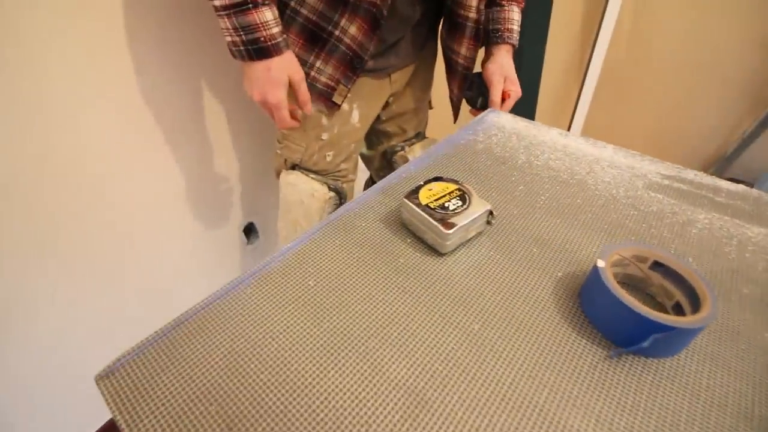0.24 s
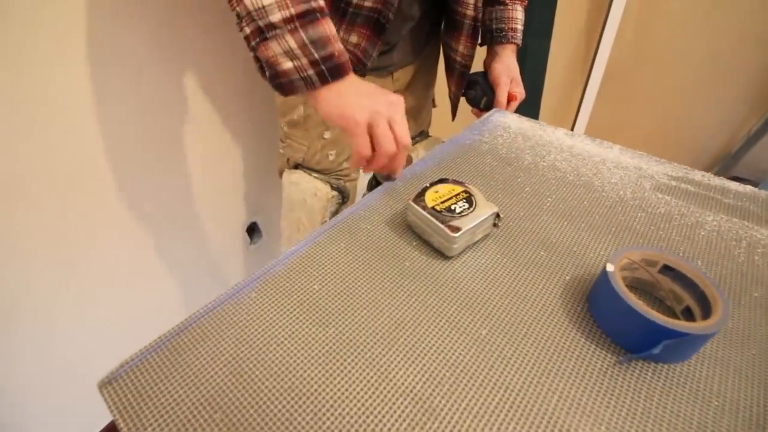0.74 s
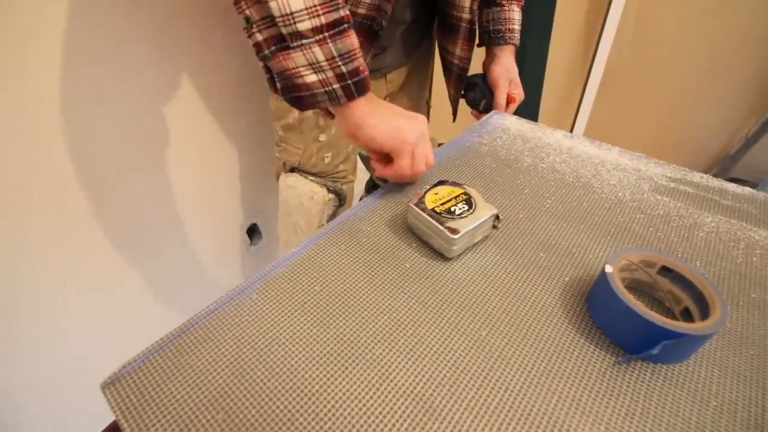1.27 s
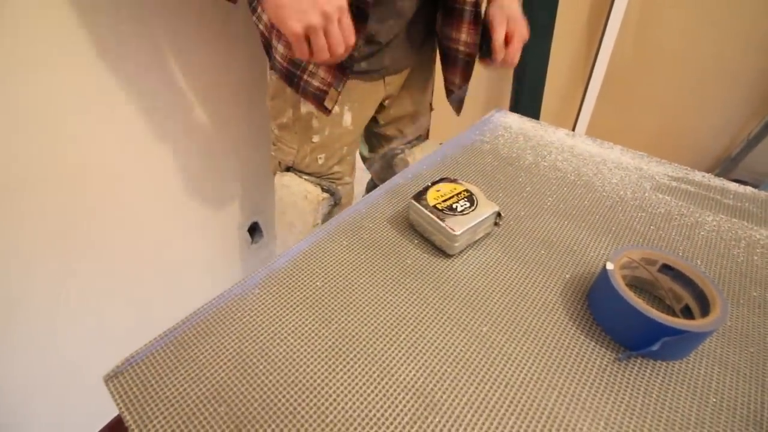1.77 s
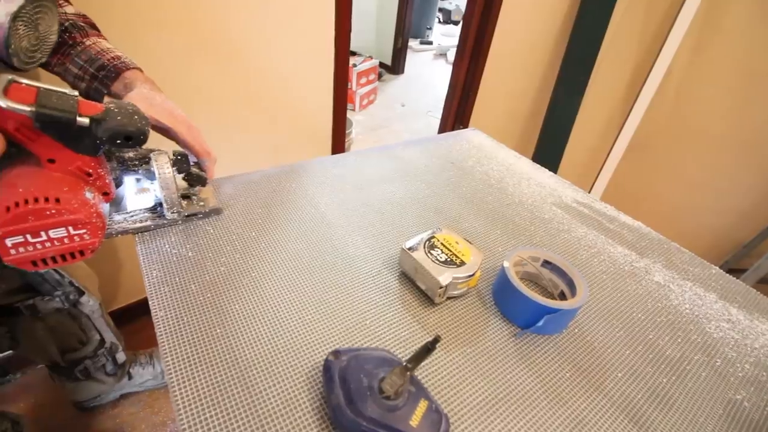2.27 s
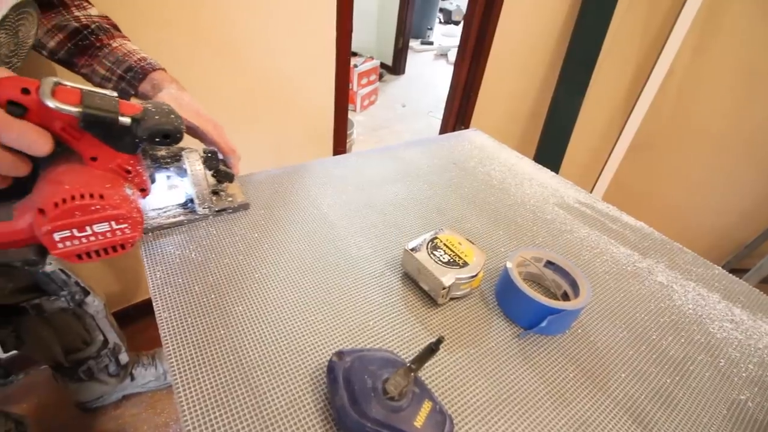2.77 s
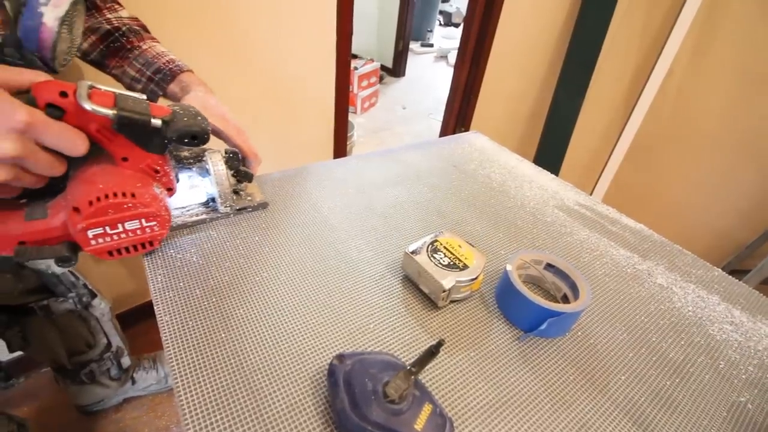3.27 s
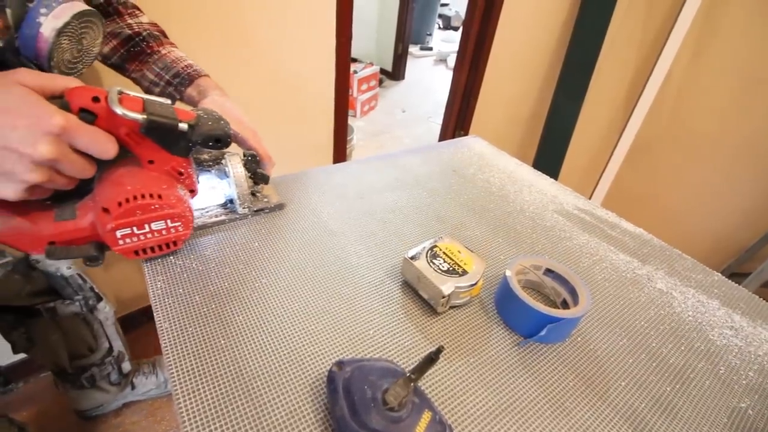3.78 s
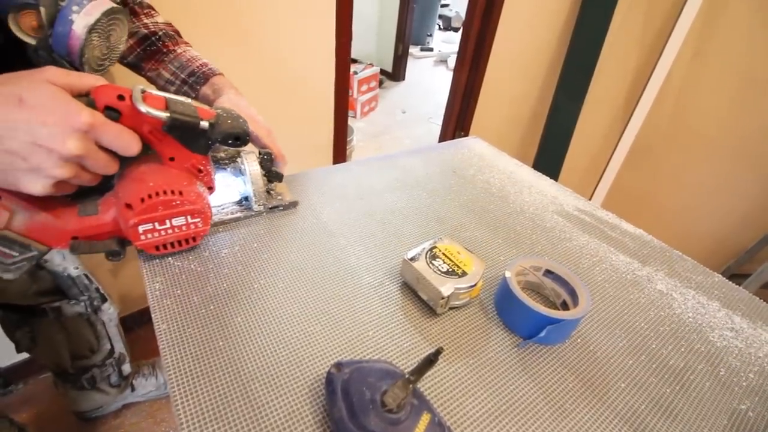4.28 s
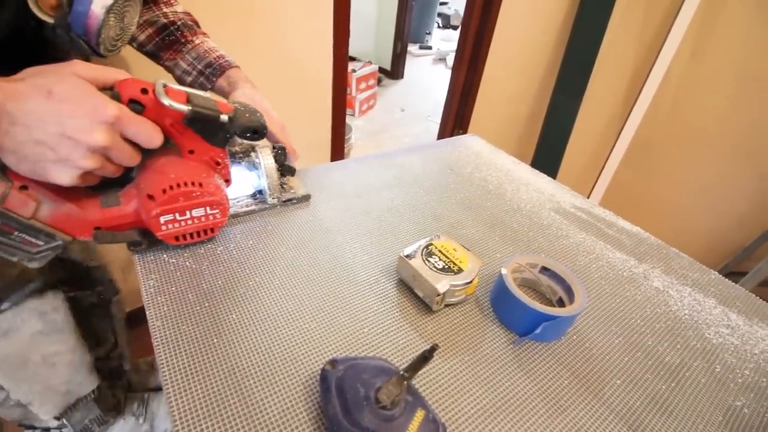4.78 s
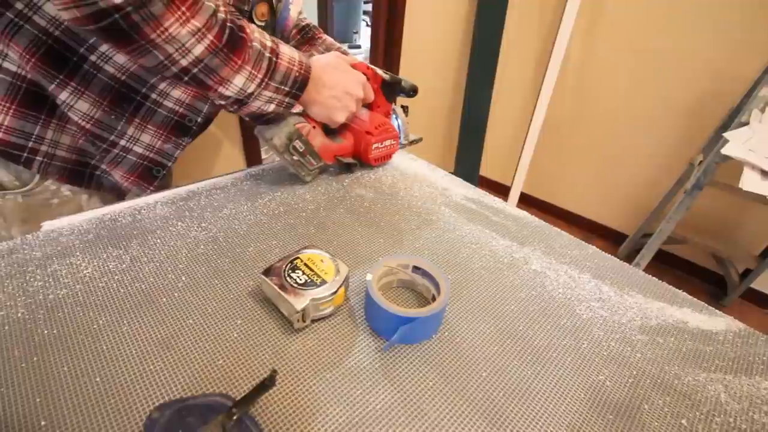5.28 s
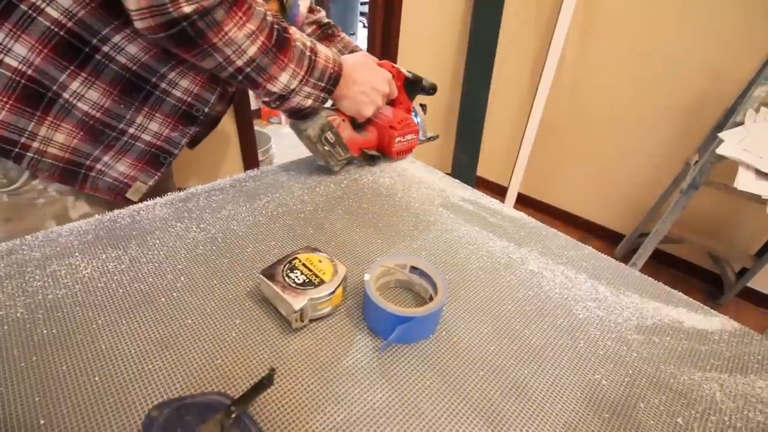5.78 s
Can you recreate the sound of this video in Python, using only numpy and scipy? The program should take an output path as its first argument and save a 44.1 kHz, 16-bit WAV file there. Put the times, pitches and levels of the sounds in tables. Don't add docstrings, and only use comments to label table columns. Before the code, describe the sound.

Chalk line plucked and snapped loudly against hollow board, a short blank gap, then a small circular saw's steady, buzzing whine through foam, turned well down.

```python
import sys
import numpy as np
from scipy import signal
from scipy.fft import rfft, irfft
from scipy.io import wavfile
from scipy.ndimage import uniform_filter1d

SR = 44100
rng = np.random.default_rng(int(sys.argv[2]) if len(sys.argv) > 2 else 0)


def magnitude_from_level(level_db):
    exponent = np.asarray(level_db, float) / 20
    return 10 ** exponent


def inscribe(sig):
    pcm = np.round(np.clip(np.atleast_2d(sig).T, -1, 1) * 32767)
    wavfile.write(sys.argv[1], SR, pcm.astype(np.int16))


N = 266364

SILENT_S = 2.1095, 2.218
START_S, FREE_TURNS_PER_S = 2.247, 76.5
EASING_S = [5.55, 5.68]
CRACK_HZ, SOFT_CRACK_HZ = 6340, 4000

# f/Hz, density/dB per Hz
TAP_COLOUR = [(35, -40), (60, -10.5), (266, -18.5), (327, -7), (423, -11.5), (572, -7), (792, -6),
              (1170, 3), (2650, -11.5), (3500, 0.5), (15500, -37)]
# f/Hz, density/dB per Hz
FAN_COLOUR = [(25, -28), (60, -30), (200, -19), (300, -12.5), (704, -11), (1520, -17.5), (1820, -16.5),
              (2450, -26), (3390, -21), (4030, -20.5), (8000, -44.5), (15500, -45.5)]
# f/Hz, density/dB per Hz
CUT_COLOUR = [(290, -21.5), (500, -28.5), (927, -17.5), (1220, -10.5), (1750, -8), (2600, -12.5),
              (3480, -3), (4190, -8), (5430, -7), (7000, -11.5), (10000, -15.5), (15500, -23.5)]
# f/Hz, width/Hz, level/dB
HOUSING_MODES = [(1283, 27, 3), (1540, 257, -5), (3750, 83, -12), (5100, 130, -2.5), (6440, 100, -32)]
# f/Hz, width/Hz, level/dB
BLADE_MODES = [(1370, 58, 0), (3070, 44, -11), (3800, 410, -1), (4130, 180, -0.5), (4800, 50, 6),
               (6230, 88, -2.5), (7840, 98, 11), (9440, 84, 8.5)]


def clock():
    return np.arange(N) / SR


def in_time(points):
    return np.interp(clock(), *np.transpose(points))


def at_hz(points, hz):
    table_hz, values = np.transpose(points)
    return np.interp(np.log(hz + 1), np.log(table_hz), values)


def ramp(span_s):
    return np.interp(clock(), span_s, [0, 1])


def bump(middle_s, width_s):
    return np.exp(-.5 * ((clock() - middle_s) / width_s) ** 2)


def noise():
    return rng.standard_normal(N)


def rms_one(x):
    return x / np.sqrt(np.mean(x ** 2) + 1e-20)


def kernel(tone, size=4096):
    cepstrum = irfft(np.log(magnitude_from_level(at_hz(tone, np.fft.rfftfreq(size, 1 / SR)))))
    cepstrum[1:size // 2] *= 2
    cepstrum[size // 2 + 1:] = 0
    return rms_one(irfft(np.exp(rfft(cepstrum)))) / np.sqrt(size)


def coloured(x, tone):
    return signal.fftconvolve(x, kernel(tone))[:N]


def filtered(x, order, hz, kind="low"):
    return signal.sosfilt(signal.butter(order, hz, kind, fs=SR, output="sos"), x)


def drift(rate):
    r = np.exp(-80 * np.pi * rate / SR)
    slow = signal.lfilter([1], [1, -2 * r, r * r], rng.standard_normal(N // 40 + 2002))[2000:]
    return np.interp(np.arange(N) / 40, np.arange(len(slow)), rms_one(slow))


def ring(x, hz, t60_s):
    r, w = magnitude_from_level(-60 / (t60_s * SR)), 2 * np.pi * hz / SR
    return signal.lfilter([0, np.sin(w)], [1, -2 * r * np.cos(w), r * r], x + 1e-18)


def resonate(x, modes):
    out = x
    for hz, width_hz, db in modes:
        gain = magnitude_from_level(db) * 2 * np.pi * width_hz / SR
        out = out + gain * ring(x, hz, 1.9 / width_hz)
    return out


def room_tail():
    # f/Hz, t60/s
    room_t60 = [(60, 0.33), (250, 0.86), (700, 0.64), (2000, 0.65), (4000, 0.59), (8000, 0.48),
                (15000, 0.32)]
    t, out = np.arange(SR) / SR, 0
    edges_hz = 35 * 2 ** np.arange(0, 9.1, .5)
    for low, high in zip(edges_hz, edges_hz[1:]):
        band = filtered(rng.standard_normal(SR), 2, [low, high], "band")
        out = out + band * magnitude_from_level(-60 * t / at_hz(room_t60, np.sqrt(low * high)))
    return out * (1 - np.exp(-t / 0.0014))


def blows(table, tone, board_db, tail, t60_s, crack_hz=CRACK_HZ):
    # f/Hz, level/dB, t60/s
    board_modes = [(75.6, -30.5, 0.26), (173, -33.5, 0.4), (336, -19.5, 0.29), (530, -23.5, 0.26),
                   (815, -38.5, 0.4), (1177, -28, 0.2), (1398, -24.5, 0.16)]
    out, click = np.zeros(N + SR), np.eye(1, SR)[0]
    fade = np.exp(-np.arange(SR) / 51.5)
    board = sum(magnitude_from_level(db + board_db + 12.5) * ring(click, hz, decay_s) for hz, db, decay_s in board_modes)
    after = board + coloured(tail, tone)[:SR]
    crack_filter = signal.butter(2, crack_hz, fs=SR)
    contact_filter = signal.butter(2, 1.7 * crack_hz, fs=SR)
    for s, peak_db, hz, room_db, crack_db in table:
        crack = magnitude_from_level(crack_db + 12.5) * signal.lfilter(*crack_filter, fade * rng.standard_normal(SR))
        tone_ring = ring(click, hz, .35 if hz < 400 else t60_s)
        contact = signal.lfilter(*contact_filter, tone_ring + crack)
        out[round(s * SR):][:SR] += magnitude_from_level(peak_db) * (contact + magnitude_from_level(room_db) * after)
    return out[:N]


def room_air_and_footfalls():
    # t/s, rumble level/dB
    steps = [(0, -58), (.17, -63), (.31, -48), (.66, -72), (.89, -64.5), (1.09, -63), (1.23, -55),
             (1.45, -61)]
    # f/Hz, density/dB per Hz
    air_tone = [(18, -43), (30, -12), (187, -12.5), (234, -7.5), (265, -2.5), (555, -7), (722, -10.5),
                (2000, -16.5), (2600, -67.5), (4400, -120)]
    rise_db_per_s, fall_db_per_s = 500, 128.5
    t = clock()
    rumble_db = np.max([db - np.maximum(rise_db_per_s * (s - t), fall_db_per_s * (t - s))
                        for s, db in steps], axis=0)
    air_level = magnitude_from_level(-65) + magnitude_from_level(rumble_db - 7)
    air = air_level * magnitude_from_level(1.6 * drift(11)) * coloured(noise(), air_tone)
    return air + magnitude_from_level(rumble_db) * rms_one(filtered(noise(), 4, 176))


def far_hiss():
    # t/s, level/dB
    hiss_db = [(0, -56.5), (.17, -72), (.3, -57.5), (.63, -57.5), (.89, -60), (1.09, -64), (1.23, -77),
               (1.36, -63.5), (1.45, -76)]
    # f/Hz, density/dB per Hz
    hiss_tone = [(1120, -48.5), (1900, -13), (2040, -15), (2260, -8), (3610, -12), (3800, -5.5),
                 (4040, -9.5), (4570, -10), (5220, -13.5), (6270, -26), (15500, -37)]
    return magnitude_from_level(in_time(hiss_db) + 0.91 * drift(22)) * coloured(noise(), hiss_tone)


def electrical_hum():
    return magnitude_from_level(-67.5 + 1.4 * drift(5)) * np.sin(2 * np.pi * 242 * clock())


def line_creaks(tail):
    # t/s, peak/dB, ring f/Hz, room/dB, crack/dB
    creaks = [
        (.078, -64, 7000, -40, -14),
        (.102, -58, 7000, -40, -12),
        (.112, -57, 7100, -40, -14),
        (.122, -61, 6900, -40, -12),
    ]
    return blows(creaks, TAP_COLOUR, -30, tail, .006)


def board_taps(tail):
    # t/s, peak/dB, ring f/Hz, room/dB, crack/dB
    taps = [
        (.1335, -62, 3770, -20, -20),
        (.1395, -26.5, 1790, -13, -7),
        (.94, -52.5, 1200, -8, -35),
    ]
    return blows(taps, TAP_COLOUR, -7.5, tail, .0058, SOFT_CRACK_HZ)


def reel_knocks(tail):
    # t/s, peak/dB, ring f/Hz, room/dB, crack/dB
    knocks = [
        (.2985, -9.5, 705, -21.5, -19),
        (.2992, -14, 5070, -56, -15),
        (1.5055, -22.5, 890, -11.5, -12),
        (1.5225, -23, 1490, -24, 1),
    ]
    # f/Hz, density/dB per Hz
    knock_tone = [(24, -43.5), (40, -17.5), (174, 1.5), (224, -6.5), (509, -2), (740, -7), (1160, -5),
                  (1250, -6.5), (2770, -18.5), (4920, -12.5), (15500, -62)]
    return blows(knocks, knock_tone, 3.5, tail, .0042, SOFT_CRACK_HZ)


def line_pull(tail):
    # t/s, peak/dB, ring f/Hz, room/dB, crack/dB
    pulls = [
        (1.095, -58.5, 231, -10.5, -25),
        (1.188, -44.5, 810, -2, -11),
        (1.2, -46.5, 335, -4.5, -23),
        (1.404, -39, 1000, -14.5, -26),
    ]
    # f/Hz, density/dB per Hz
    pull_tone = [(35, -53.5), (60, -23.5), (298, -15), (335, -3), (368, -13), (572, -26.5), (721, -20),
                 (869, -25.5), (3500, -26), (15500, -56)]
    return blows(pulls, pull_tone, 2.7, tail, .0065)


def line_lift(tail):
    # t/s, peak/dB, ring f/Hz, room/dB, crack/dB
    lifts = [
        (1.4675, -34, 2400, -7, -0.5),
        (1.478, -35, 6000, -10, -25),
    ]
    # f/Hz, density/dB per Hz
    lift_tone = [(35, -49.5), (60, -7.5), (343, 1.5), (721, -10.5), (889, -22), (1590, -10.5), (2360, -8.5),
                 (3270, -17), (5200, -13), (15500, -54.5)]
    return blows(lifts, lift_tone, -12.5, tail, .0068, SOFT_CRACK_HZ)


def line_pluck(tail):
    # t/s, peak/dB, ring f/Hz, room/dB, crack/dB
    plucks = [
        (1.5265, 4.5, 4690, -20.5, -12.5),
        (1.5415, -19.5, 4800, -22, -5.5),
    ]
    # f/Hz, density/dB per Hz
    pluck_tone = [(24, -52), (40, -12.5), (103, -9.5), (235, -24), (333, -6.5), (427, -12), (522, -11),
                  (704, -12.5), (859, -8.5), (998, -10.5), (2160, -12.5), (4680, -6.5), (15500, -39.5)]
    return blows(plucks, pluck_tone, 0, tail, .008)


def line_snap(tail):
    # t/s, peak/dB, ring f/Hz, room/dB, crack/dB
    snaps = [
        (1.7555, -19.5, 3920, -6.5, -13),
        (1.7612, 6.5, 1770, -17.5, -12.5),
        (1.7806, -6, 2100, -31.5, -27.5),
    ]
    # f/Hz, density/dB per Hz
    snap_tone = [(24, -50), (40, -27.5), (64, 9), (96, 2), (179, -8), (548, -4), (704, -10.5), (1490, 2.5),
                 (2640, -3.5), (3650, 2.5), (5720, -13), (7710, -13.5), (15500, -61.5)]
    return blows(snaps, snap_tone, -19.5, tail, .0072)


def trigger_clicks(tail):
    # t/s, peak/dB, ring f/Hz, room/dB, crack/dB
    clicks = [
        (2.219, -63.5, 4250, -8.5, 0),
        (2.2655, -56, 250, -2.5, 3),
        (2.276, -58, 6000, -8.5, -10),
        (2.323, -44, 6280, -34, 0),
        (2.341, -42.5, 6197, -21, -14.5),
        (2.363, -55.5, 4800, -13, -5),
    ]
    return blows(clicks, FAN_COLOUR, -28, tail, .03, SOFT_CRACK_HZ)


def blade_speed():
    # t/s, speed/turns per s
    running = [(2.9, 76.56), (3.1, 75.9), (3.5, 76.7), (3.62, 76.45), (3.8, 75.7), (4.3, 75.17),
               (4.5, 75.16), (4.65, 74.55), (4.82, 74.33), (5.03, 73.55), (5.2, 74.17), (5.247, 74.2),
               (5.257, 70.1), (5.5, 70.25), (5.63, 70.2), (5.75, 71), (5.9, 73.24)]
    spin_up_s = .107
    return in_time(running) - FREE_TURNS_PER_S * np.exp(-np.maximum(clock() - START_S, 0) / spin_up_s)


def rotor_hum(turns, speed):
    # f/Hz, level/dB
    rotor_in_room = [(225, -86), (247, -65), (262, -61), (270, -61), (275, -78), (279, -65), (283, -59),
                     (286.5, -56)]
    per_turn = 3.75
    level_db = np.interp(per_turn * speed, *np.transpose(rotor_in_room))
    return magnitude_from_level(level_db + 3 + 0.64 * drift(14)) * np.sin(2 * np.pi * per_turn * turns)


def fan_air(speed, swing_db):
    level_db = -64.5 + 0.42 * swing_db + 2 * ramp(EASING_S)
    level_db = level_db + 20 * np.log10(np.abs(speed) / FREE_TURNS_PER_S + .01)
    air = resonate(coloured(noise(), FAN_COLOUR), HOUSING_MODES)
    return magnitude_from_level(level_db + 3.2 * drift(17)) * rms_one(air)


def uneven_teeth(turns, renewals_per_s=1.5):
    patterns = rng.standard_normal((24, 600))
    age = np.clip((clock() - START_S) * renewals_per_s, 0, 22)
    where, older = (turns % 1 * 600).astype(int), age.astype(int)
    blend = age % 1 * np.pi / 2
    return np.cos(blend) * patterns[older, where] + np.sin(blend) * patterns[older + 1, where]


def foam_rasp(turns, cut, effort_db, surge):
    wobble_db = 2.4 * np.sin(2 * np.pi * turns)
    level = magnitude_from_level(effort_db) + magnitude_from_level(-50) * surge
    return level * magnitude_from_level(1 + wobble_db + 1.3 * drift(30)) * rms_one(resonate(cut, HOUSING_MODES))


def start_up_rattle(cut, surge):
    return magnitude_from_level(-61 + 8.6 * drift(30)) * surge * rms_one(resonate(cut, BLADE_MODES) - cut)


def guard_ticks(turns, speed):
    gate = np.exp(2.5 * (np.cos(2 * np.pi * turns) - 1)) * magnitude_from_level(4.5 * drift(25))
    bright = filtered(noise(), 4, 7500, "high")
    fades_s, fade_db_per_s = 3.15, 16
    level_db = -61 + 1.5 * drift(4) - fade_db_per_s * np.maximum(clock() - fades_s, 0)
    return magnitude_from_level(level_db) * (speed / FREE_TURNS_PER_S) ** 2 * rms_one(gate * bright)


def whine(turns, multiples, strengths, run_up_db, swell_db, flutter_db):
    enter_s, sink_s, far_view_s = [3.55, 3.66], [3.6, 4.65], 5.252
    out, rising = 0, 1 - ramp([2.45, 2.75])
    near = clock() < far_view_s
    unsettled = 1 + 1.2 * rising
    for multiple, (free_db, cutting_db, far_db) in zip(multiples, strengths):
        load = ramp(enter_s if multiple > 50 else sink_s)
        damped_db = -5 * ramp([sink_s[1], far_view_s]) * (multiple < 16)
        near_db = free_db + (cutting_db - free_db) * load + damped_db
        level_db = np.where(near, near_db, far_db) + 4
        level_db = level_db + (run_up_db + 6 * (multiple > 90)) * rising
        wander_db = swell_db * drift(6) + flutter_db * unsettled * drift(35)
        level_db = level_db + np.minimum(wander_db, 4)
        level_db = level_db - (4 + multiple / 16) * ramp(EASING_S) * (multiple > 60)
        blur = .005 * unsettled * multiple * drift(45)
        phase = 2 * np.pi * multiple * turns + rng.uniform(0, 6.8) + blur
        out = out + magnitude_from_level(level_db) * np.sin(phase)
    return out


def gear_whine(turns, surge_db):
    gear_multiples = [1, 2, 4.75, 7.5, 9.32, 15, 16.06, 17, 43, 44, 45, 46, 47]
    # free/dB, cutting/dB, from afar/dB
    gear_strengths = [(-84, -104, -92), (-88, -79, -93), (-77.5, -78, -85), (-77, -82, -93),
                      (-72, -74, -94), (-75, -86, -70.5), (-78, -75, -73.5), (-89, -69, -79.5),
                      (-72, -83, -79.5), (-66.5, -72, -68), (-68, -62, -61.5), (-68, -64, -77.5),
                      (-82.5, -70, -63.5)]
    return magnitude_from_level(surge_db) * whine(turns, gear_multiples, gear_strengths, -8, swell_db=2, flutter_db=3.5)


def tooth_whine(turns, surge_db, swing_db):
    tooth_multiples = [23, 24, 36, 48, 60, 72, 84, 96, 108, 120, 132, 144, 168, 192, 204]
    # free/dB, cutting/dB, from afar/dB
    tooth_strengths = [(-89, -72, -74), (-69, -69, -60), (-81, -76, -75), (-70, -59.5, -57),
                       (-80, -69, -62), (-71, -62, -54), (-74, -68, -72), (-72, -70, -65), (-85, -73, -84),
                       (-75, -71, -61), (-80, -78, -81), (-73, -78, -63), (-72, -74, -66), (-77, -79, -76),
                       (-90, -86, -84)]
    tones = whine(turns, tooth_multiples, tooth_strengths, -4, swell_db=2.8, flutter_db=4.5)
    return magnitude_from_level(0.56 * swing_db + surge_db) * tones


def plate_squeals(turns):
    squeal_multiples = [21, 72, 47, 23, 33, 17, 96, 23, 23.5]
    # t/s, half length/s, level/dB
    squeals = [(2.392, 0.023, -57.5), (2.432, .035, -53), (2.48, .05, -56), (4.415, 0.16, -57),
               (4.488, 0.11, -53.5), (5.062, 0.037, -53), (5.497, 0.043, -49), (5.765, 0.05, -49.5),
               (5.88, 0.012, -48)]
    out = 0
    for multiple, (s, width_s, db) in zip(squeal_multiples, squeals):
        tone = np.sin(2 * np.pi * multiple * turns + .4 * drift(40))
        out = out + magnitude_from_level(db + 1.4 * drift(25)) * bump(s, width_s) * tone
    return out


def saw():
    # t/s, rasp level/dB
    effort = [(2.62, -57.5), (2.86, -59.5), (3.0, -55.5), (3.25, -57), (3.5, -59), (3.72, -48.5),
              (3.9, -51.5), (4.6, -50), (4.9, -50), (5.06, -48), (5.14, -49.5), (5.8, -50), (5.9, -49)]
    speed = blade_speed()
    turns = np.cumsum(speed + .08 * drift(25)) / SR
    effort_db, surge = in_time(effort), bump(2.44, .05)
    swing_db, surge_db = effort_db + 55, 6 * surge
    cut = coloured(0.81 * noise() + 0.61 * uneven_teeth(turns), CUT_COLOUR)

    whine_db = np.interp(clock(), [2.3, 2.43, 5.9, 5.96], [-15.5, 0, 0, -15.5])
    tones = (gear_whine(turns, surge_db) + tooth_whine(turns, surge_db, swing_db)) * magnitude_from_level(whine_db)
    tones = resonate(tones + plate_squeals(turns), BLADE_MODES)
    whole = rotor_hum(turns, speed) + fan_air(speed, swing_db) + foam_rasp(turns, cut, effort_db, surge)
    whole = whole + start_up_rattle(cut, surge) + guard_ticks(turns, speed) + tones

    top = whole - filtered(whole, 2, 5000)
    dulled = whole - top * (1 - magnitude_from_level(-20 * ramp([5.91, 6.02])))
    switched_on = np.clip((clock() - 2.2655) / .003, 0, 1)
    fade_in_db = -17 * (1 - ramp([START_S, START_S + .11]))
    fade_out_db = -58 * np.maximum(clock() - 5.936, 0)
    return switched_on * magnitude_from_level(fade_in_db + fade_out_db) * dulled


def scene():
    tail = room_tail()
    first = room_air_and_footfalls() + far_hiss() + electrical_hum()
    for source in (line_creaks, board_taps, reel_knocks, line_pull, line_lift, line_pluck, line_snap):
        first = first + source(tail)
    second = trigger_clicks(tail) + saw()
    return (first * (clock() < SILENT_S[0]) + second * (clock() > SILENT_S[1]))[None]


def top_cut(x):
    return signal.sosfilt(signal.butter(12, 15780, fs=SR, output="sos"), x)


def record(dry):
    heard = filtered(dry, 2, 56.4, "high")
    loudness = uniform_filter1d(np.abs(heard), size=2000, origin=999)
    heard = heard + magnitude_from_level(-39) * loudness * noise()
    ceiling = np.where(clock() > SILENT_S[1], magnitude_from_level(-44.3), 1)
    knee = 6
    return top_cut(heard / (1 + np.abs(heard / ceiling) ** knee) ** (1 / knee))


dry = scene()
out = record(dry)
inscribe(out)
```